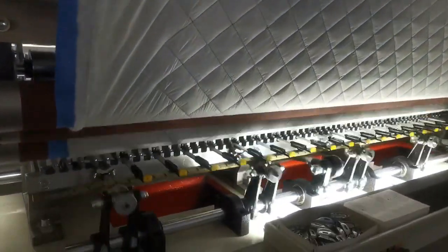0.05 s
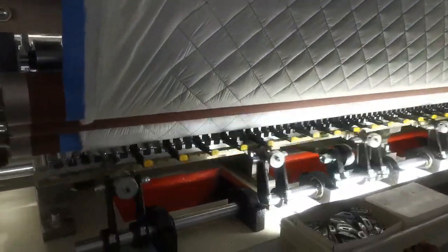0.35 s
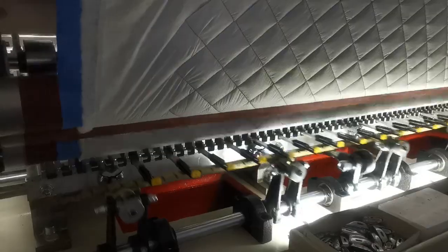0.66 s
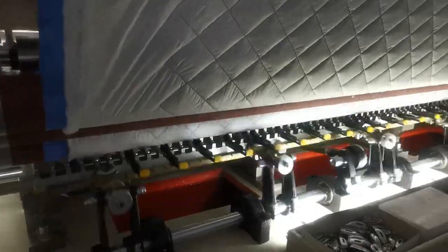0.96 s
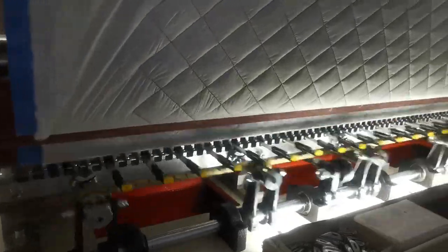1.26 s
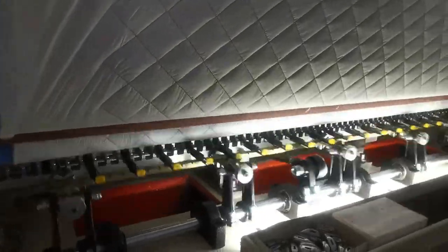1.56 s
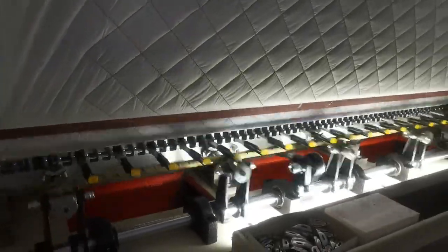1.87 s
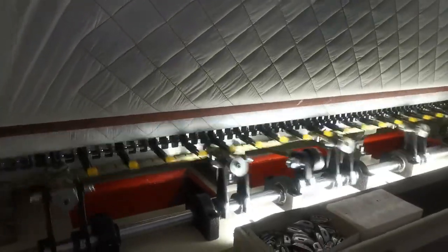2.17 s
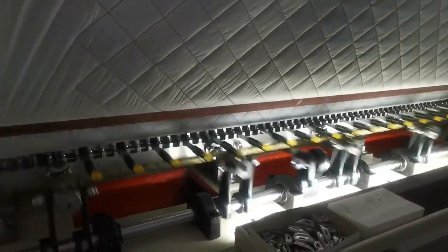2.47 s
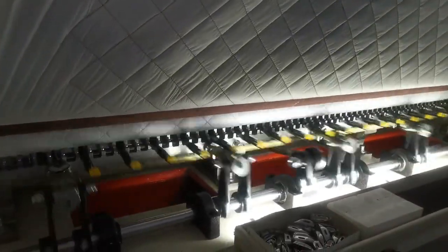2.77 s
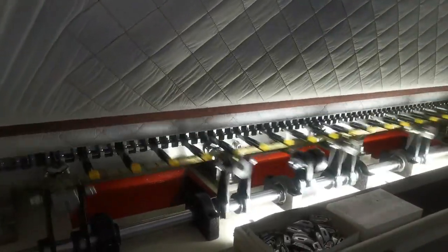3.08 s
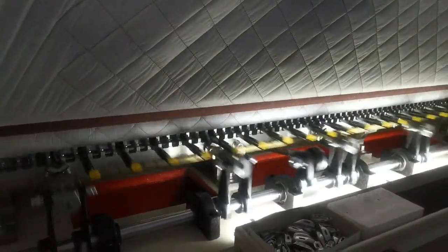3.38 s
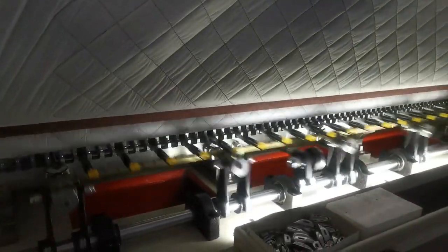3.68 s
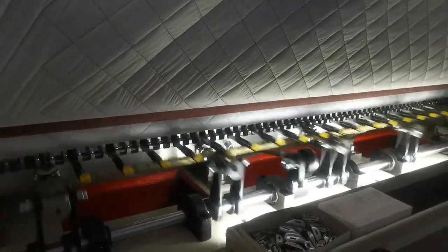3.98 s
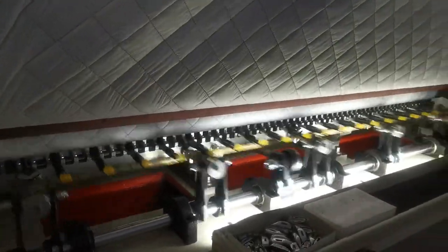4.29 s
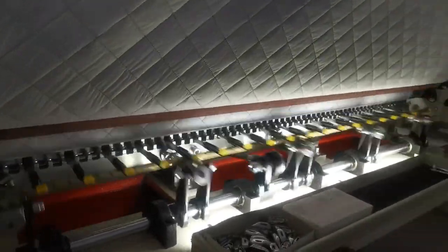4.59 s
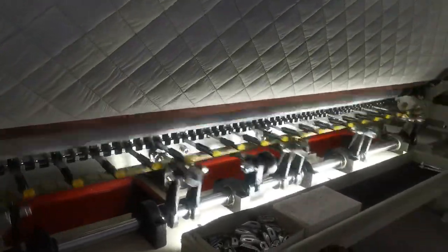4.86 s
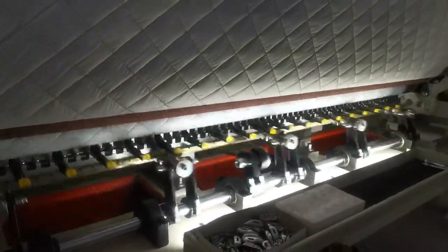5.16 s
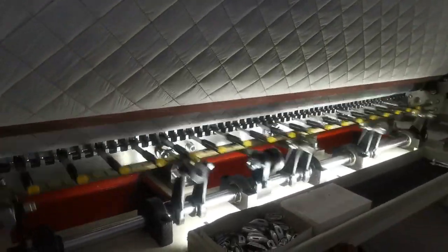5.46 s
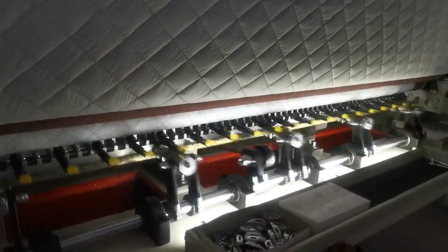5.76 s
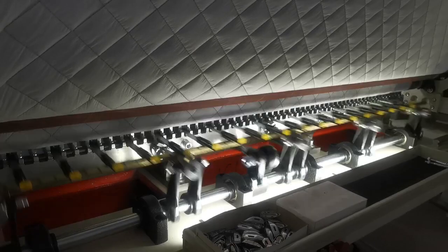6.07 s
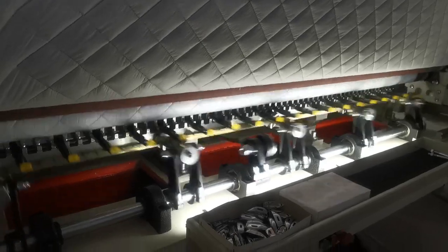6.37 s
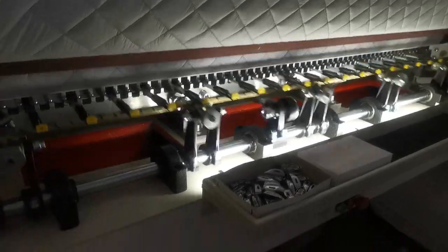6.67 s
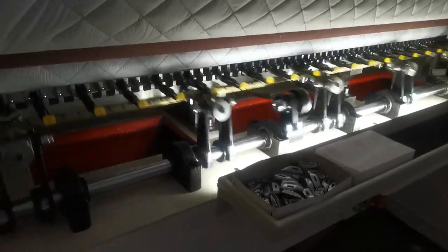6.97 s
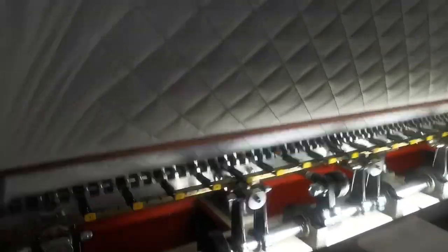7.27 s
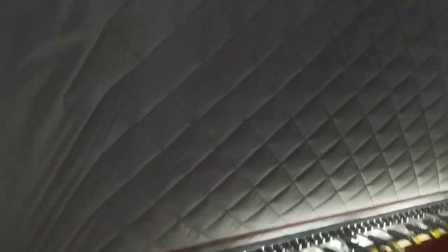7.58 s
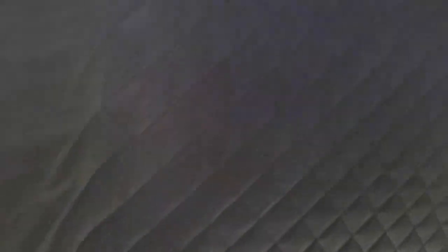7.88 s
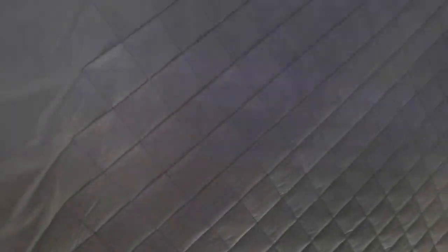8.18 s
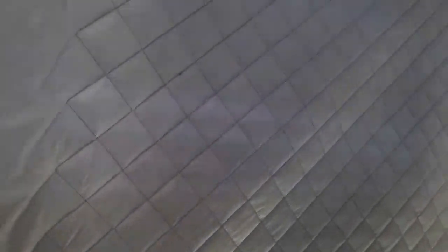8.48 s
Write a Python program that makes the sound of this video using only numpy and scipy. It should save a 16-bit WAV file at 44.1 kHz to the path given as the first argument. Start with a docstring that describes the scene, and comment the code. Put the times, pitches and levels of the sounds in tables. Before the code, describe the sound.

Fast, regular metal clatter comes from a quilting machine heard close up in a workshop with a short echo. Each stitch brings low thumps, a ringing steel clack and a rattle of needles, with a motor humming underneath. Hollow clunks and scraping stand out at first, ease off, then swell and slowly fade midway. Toward the end the handheld microphone shifts and a soft, rough whine rises and holds.

```python
"""Fast steel clacking over a thumping frame: a multi-needle quilting machine, close, in a workshop.
In each stitch, 500 a minute, rocker arms thump the frame, loopers clack and the needle bar rattles
through the quilt. Under load the traversing carriage clunks, knocks and scrapes harder; a motor hums.
The handheld microphone drifts away, then turns up to the quilt as a feed drive starts to whine."""
import sys
import numpy as np
from scipy import signal
from scipy.fft import rfft, irfft, next_fast_len
from scipy.io import wavfile
from scipy.ndimage import map_coordinates

SR = 44100
rng = np.random.default_rng(int(sys.argv[2]) if len(sys.argv) > 2 else 0)


def int16_out(signal):
    """Quantize to a 16-bit WAV file."""
    q = np.round(np.clip(np.atleast_2d(signal).T, -1, 1) * 32767)
    wavfile.write(sys.argv[1], SR, q.astype(np.int16))


N = 376613
T = np.arange(N) / SR
STITCH_S, FIRST_STITCH_S = .12, .056
STITCHES_S = FIRST_STITCH_S + STITCH_S * np.arange(-1, N / SR / STITCH_S)
FEED_ON_S, FEED_RISE_S, FEED_HZ, FEED_DB = 7.55, .35, 591, -46
TURN_AT_S, TURN_TAKES_S = 7.1, .55
# response to carriage load: free_db, added_at_full_load_db
SHUDDER_DB, KNOCK_DB, CLUNK_DB, SCRAPE_DB = (-40, 1.4), (-14, 12.5), (-62, 15), (-52, 7)
ROCKER_DB, BAR_DB = (1.5, -2.5), (1.1, -.5)  # a loaded frame is braced, thumps less

# room decay: freq_hz, t60_s
ROOM_DECAY = [(200, 0.35), (2000, 0.37), (8000, 0.24), (15000, 0.15)]
# main motor lines: pitch_hz, level_db
MOTOR_LINES = [(118, -59.5), (275, -46.5)]
# machine rocking: stitch_rate_multiple, level_db
SWAY_LINES = [(5, -56), (7, -60), (8, -56), (11, -55), (12, -51), (14, -54.5)]
# spectra of the parts: freq_hz, gain_db
WHIRR_SPECTRUM = [(300, -11.5), (1200, -8), (2600, 0), (4200, -2), (6300, -5), (8000, -3.5), (9500, -14),
                  (11500, -21.5), (15000, -33)]
RUMBLE_SPECTRUM = [(20, -34), (42, -15), (75, -19), (125, -1), (220, 0.5), (380, -6.5), (500, -6.5),
                   (800, -9), (1400, -16.5), (3000, -27), (8000, -33)]
SHUDDER_SPECTRUM = [(20, -40), (110, -25), (155, -5), (210, -8), (295, 1), (400, -1), (500, -6), (620, -3),
                    (850, -4), (1200, -12), (2500, -27), (5000, -55)]
CLUNK_SPECTRUM = [(150, -21), (500, -8.5), (930, 1), (1150, 1), (1450, -5.5), (1750, -4.5), (2000, -0.5),
                  (2350, 0.5), (3000, -15), (9000, -34)]
SCRAPE_SPECTRUM = [(150, -25), (350, -1.5), (480, -7.5), (620, -2), (760, -0.5), (920, -4), (1200, -10),
                   (2000, -16), (6000, -36)]
LOOPER_SPECTRUM = [(500, -26), (1500, -17), (2600, -3.5), (4000, -1), (5000, 4), (6300, -2.5), (8000, 3),
                   (9300, -5), (11500, -17), (15000, -11)]
NEEDLE_SPECTRUM = [(500, -29.5), (1500, -8), (2500, -0.5), (4000, -2.5), (5200, 1), (6300, -4),
                   (8000, -2.5), (9300, -7), (11500, -18), (15000, -18)]
# reversals and carriage knocks within a stitch: start_s, pitch_hz, level_db, swell_s
ROCKER_THUMPS = [(.0283, 182, -25, .0054), (.0432, 200, -37, .006), (.1205, 280, -37, .004)]
BAR_THUMPS = [(.0604, 135, -30, .004), (.0685, 222, -25.5, .0034), (.088, 250, -35, .004),
              (.1012, 160, -36, .005)]
CARRIAGE_KNOCKS = [(.0575, 443, -29.5, 0.003), (.0695, 287, -30, 0.0029), (.0525, 920, -32, 0.0028)]
# slow swing of the frame's thumps: time_s, gain_db
THUMP_SWING = [(0, -2), (4.05, 0.5), (4.4, -3), (5.3, -3), (5.75, 0.5), (6.25, -3.5), (7.1, -5),
               (7.55, 0.5), (8.54, -3)]
# carriage traverses: loaded_at_s, rise_s, hold_s, fall_s, load_fraction
CARRIAGE_TRAVERSES = [(0, .1, 0.69, 0.18, 0.92), (1.87, 0.16, 0.12, 0.2, 0.33),
                      (4.8, 1.25, 0.58, 2.5, 0.93)]
# contact volleys within a stitch: start_s, length_s, level_db, fade_db
CLUNK_VOLLEYS = [(.0495, .008, 0, 2)]
SCRAPE_VOLLEYS = [(.05, .038, 0, 3)]
LOOPER_VOLLEYS = [(.0048, 0.0027, -11.5, -6.5), (.008, .008, 0.5, 1.5), (.016, .016, 0, 11),
                  (.033, 0.025, -9, -4), (.113, 0.0093, -12, -3)]
NEEDLE_VOLLEYS = [(.0672, .012, -2.5, 1.6), (.079, .016, -2.5, 1.4), (.095, 0.01, -10, 9.9)]
# harder looper strikes: time_s, extra_db
LOOPER_ACCENTS = [(0.184, 0.5), (0.544, 1.5), (0.784, 0.5), (1.024, 2), (1.384, 1.2), (3.664, 1.5),
                  (6.304, 1.5), (6.544, 1.5), (7.744, 1.5), (8.344, 2)]
# resonances of small steel parts: centre_hz, half_width_hz, gain_db
STEEL_PEAKS = [(5090, 240, 4), (5510, 210, 3.5), (7130, 430, 6.5), (7734, 253, 7), (8820, 220, 4),
               (10440, 220, 2.5)]
# ringing modes: pitch_hz, level_db
LOOPER_MODES = [(5030, 5), (7600, -8)]
NEEDLE_MODES = [(5380, 4), (7800, -13)]
# microphone closeness to the moving parts: time_s, near_db
MIC_CLOSENESS = [(0, 3.5), (.6, 2.5), (1.6, 0.5), (3, -0.7), (4, 0.5), (7.15, -1.8), (7.65, 2.6),
                 (8.54, 1.9)]
# left-right likeness at the microphone ports: freq_hz, correlation
PORT_LIKENESS = [(100, 0.94), (250, 0.94), (500, 0.71), (1000, 0.073), (4000, 0)]
# port colour: freq_hz, left_minus_right_db
PORT_TILT = [(60, -3), (110, -1.5), (200, -3.5), (380, -1.5), (700, -3.5), (1290, 0), (2380, 0.5),
             (4400, -2), (8120, 0.5), (15000, -3)]


def amp(db):
    """Decibels to gain."""
    return 10 ** (np.asarray(db) / 20)


def unit(x):
    """Scale to rms 1."""
    return x / np.sqrt(np.mean(x ** 2) + 1e-20)


def along(points, hz):
    """Interpolate (freq_hz, value) points on a log axis."""
    freq_hz, values = np.transpose(points)
    return np.interp(np.log(hz + 1), np.log(freq_hz + 1), values)


def curve(points):
    """Interpolate (time_s, value) points per sample."""
    return np.interp(T, *np.transpose(points))


def ramp(start_s, length_s):
    """Straight rise from 0 to 1."""
    return np.clip((T - start_s) / length_s, 0, 1)


def wobble(rate_hz):
    """Smooth random curve, rate_hz knots a second."""
    return map_coordinates(rng.standard_normal(int(N * rate_hz / SR) + 4), [T * rate_hz])


def loaded_db(response, load):
    """Gain of a part under load."""
    free_db, added_db = response
    return free_db + added_db * load


def coloured(x, spectrum, peaks=()):
    """Minimum-phase filter: a spectrum plus resonance peaks. Output rms 1."""
    size = 2 * next_fast_len(N // 2 + SR // 10)
    hz = np.fft.rfftfreq(size, 1 / SR)
    peaks_db = sum(db / (1 + ((hz - centre) / width) ** 2) for centre, width, db in peaks)
    cepstrum = irfft(np.log(amp(along(spectrum, hz) + peaks_db)), size)
    cepstrum[1:size // 2] *= 2
    cepstrum[size // 2 + 1:] = 0
    return unit(irfft(rfft(x, size) * np.exp(rfft(cepstrum)), size)[..., :N])


def spread(pair, spectrum):
    """Two unrelated signals to stereo of rms 1: long waves reach both ports alike."""
    size = next_fast_len(N)
    hz = np.fft.rfftfreq(size, 1 / SR)
    angle = np.arccos(along(PORT_LIKENESS, hz)) / 2
    gain = amp(along(spectrum, hz)) * [np.cos(angle), np.sin(angle)]
    mid, side = irfft(rfft(pair, size) * gain, size)[:, :N]
    return unit(np.array([mid + side, mid - side]))


def thumps(rows, scatter_db, detune):
    """Each push swings the heavy frame for a few cycles."""
    out, t = np.zeros(N + 2 * SR), np.arange(SR // 10) / SR
    for stitch_s in STITCHES_S:
        for start_s, hz, db, swell_s in rows:
            force, bend = rng.standard_normal(2)
            envelope = (t / swell_s) ** 2 * np.exp(2 * (1 - t / swell_s))
            swing = envelope * np.sin(2 * np.pi * hz * (1 + detune * bend) * t)
            out[round((1 + stitch_s + start_s) * SR):][:len(t)] += amp(db + scatter_db * force) * swing
    return out[SR:SR + N]


def volleys(rows, count, stitch_scatter_db, hit_scatter_db, jitter_s, accent_db=0):
    """Stereo impulses: in each stitch a row of like parts makes contact, one after another."""
    out = np.zeros((2, N))
    for start_s, length_s, db, fade_db in rows:
        slip, force = rng.standard_normal((2, len(STITCHES_S), 1))
        place = (np.arange(count) + rng.random((len(STITCHES_S), count))) / count
        hit_s = STITCHES_S[:, None] + start_s + jitter_s * slip + length_s * place
        hit_db = db - fade_db * place + accent_db + stitch_scatter_db * force
        hits = amp(hit_db + hit_scatter_db * rng.standard_normal(hit_s.shape))
        hits *= rng.choice([-1, 1], hit_s.shape)
        lag_s = rng.uniform(-.0004, .0004, hit_s.shape)  # parts lie left and right along the bed
        for channel, side in zip(out, (-1, 1)):
            at = np.round((hit_s + side * lag_s) * SR).astype(int)
            heard = (at >= 0) & (at < N)
            channel += np.bincount(at[heard], hits[heard], N)
    return out


def pings(modes, start_s, t60_s, detune, scatter_db, accent_db=0):
    """Steel rings on after a volley, at a slightly different pitch each time. Stereo, rms 1."""
    out, t = np.zeros((2, N + 2 * SR)), np.arange(SR // 10) / SR
    for channel in out:
        for stitch_s, extra_db in np.broadcast(STITCHES_S, accent_db):
            for hz, db in modes:
                force, bend = rng.standard_normal(2)
                envelope = amp(db + extra_db + scatter_db * force - 60 * t / t60_s)
                at = round((1 + stitch_s + start_s + .002 * rng.random()) * SR)
                channel[at:at + len(t)] += envelope * np.sin(2 * np.pi * hz * (1 + detune * bend) * t)
    return np.array([unit(channel[SR:SR + N]) for channel in out])


def workshop(x):
    """Diffuse, smooth room tail, drawn afresh every quarter second; each frequency has its own decay."""
    out, block = np.zeros((2, N + SR)), SR // 4
    for at in range(0, N, block):
        hz, t, noise = signal.stft(rng.standard_normal((2, SR // 3)), SR, nperseg=256)
        decay = amp(-60 * t / along(ROOM_DECAY, hz)[:, None])
        tail = signal.istft(noise * decay, SR, nperseg=256)[1]
        wet = signal.fftconvolve(x[:, at:at + block], tail / np.linalg.norm(tail[0]), axes=1)
        out[:, at:at + wet.shape[1]] += wet
    return out[:, :N]


def motors():
    """Slightly unsteady hum of the main motor; the feed drive's rough whine swells and holds."""
    def line(hz, waver_rad):
        return unit(np.sin(2 * np.pi * hz * T + waver_rad * wobble(25)))
    hum = sum(amp(db) * line(hz, waver_rad=.38) for hz, db in MOTOR_LINES)
    whine = amp(FEED_DB) * ramp(FEED_ON_S, FEED_RISE_S) * line(FEED_HZ, waver_rad=1.15)
    return hum + whine


def whirr():
    """Bearings and running threads keep the steel ringing between blows."""
    return coloured(rng.standard_normal((2, N)), WHIRR_SPECTRUM, STEEL_PEAKS)


def sway():
    """Swinging masses rock the machine at multiples of the stitch rate."""
    out = np.zeros(N)
    for multiple, db in SWAY_LINES:
        gain = amp(db + 2 * wobble(1.96))
        out += gain * unit(np.cos(2 * np.pi * (multiple * T / STITCH_S + rng.random())))
    return out


def shudder(drift_s):
    """Cams and linkages shake the frame the same way on every shaft turn."""
    period = round(STITCH_S * SR)
    cycle = irfft(np.exp(2j * np.pi * rng.random((2, period // 2 + 1))), period)
    at = np.round((T + drift_s * wobble(6)) * SR).astype(int) % period
    return spread(cycle[:, at], SHUDDER_SPECTRUM)


def frame(load, near_db):
    """The heavy frame thumps, sways and shudders; the carriage taking up play adds hollow knocks."""
    swing_db = curve(THUMP_SWING)
    rockers = thumps(ROCKER_THUMPS, scatter_db=.44, detune=.0071)
    rockers *= amp(loaded_db(ROCKER_DB, load) + swing_db)
    needle_bar = thumps(BAR_THUMPS, scatter_db=1, detune=.0083)
    needle_bar *= amp(loaded_db(BAR_DB, load) + .7 * swing_db)
    swaying = sway()
    shaking = amp(-2.5) * shudder(drift_s=.00012) + spread(rng.standard_normal((2, N)), RUMBLE_SPECTRUM)
    shaking *= amp(loaded_db(SHUDDER_DB, load) + .62 * near_db)
    knocks = thumps(CARRIAGE_KNOCKS, scatter_db=.8, detune=.04)
    knocks *= amp(loaded_db(KNOCK_DB, load) + near_db)
    return rockers + needle_bar + swaying + knocks + shaking


def carriage_load():
    """Each traverse takes up load, holds it and lets it go."""
    return sum(load * (ramp(at_s - rise_s, rise_s) - ramp(at_s + hold_s, fall_s))
               for at_s, rise_s, hold_s, fall_s, load in CARRIAGE_TRAVERSES)


def carriage(load, turn):
    """Once a stitch the carriage takes up its play and judders along its rail."""
    clunks = volleys(CLUNK_VOLLEYS, count=20, stitch_scatter_db=-1.1, hit_scatter_db=3.5, jitter_s=.0005)
    judder = volleys(SCRAPE_VOLLEYS, count=30, stitch_scatter_db=2.5, hit_scatter_db=4, jitter_s=.00051)
    clunk_db = loaded_db(CLUNK_DB, load)
    scrape_db = loaded_db(SCRAPE_DB, load) + .5 * turn  # the turned microphone hears more rail
    clunk = amp(clunk_db) * coloured(clunks, CLUNK_SPECTRUM)
    return clunk + amp(scrape_db) * coloured(judder, SCRAPE_SPECTRUM)


def loopers():
    """The steel loopers snap shut together and ring; harder strikes ring more."""
    time_s, extra_db = np.transpose(LOOPER_ACCENTS)
    accent_db = (abs(STITCHES_S[:, None] - time_s) < STITCH_S / 2) @ extra_db
    hits = volleys(LOOPER_VOLLEYS, count=60, stitch_scatter_db=.24, hit_scatter_db=3.5, jitter_s=.0003,
                   accent_db=accent_db[:, None])
    ring = pings(LOOPER_MODES, start_s=.008, t60_s=.038, detune=.025, scatter_db=2,
                 accent_db=2.3 * accent_db)
    return coloured(hits, LOOPER_SPECTRUM, STEEL_PEAKS) + amp(-9.5) * ring


def needles():
    """Half a stitch after the loopers the needles rattle through the quilt, ringing a little higher."""
    hits = volleys(NEEDLE_VOLLEYS, count=90, stitch_scatter_db=1.25, hit_scatter_db=2, jitter_s=.0004)
    ring = pings(NEEDLE_MODES, start_s=.069, t60_s=.082, detune=.0116, scatter_db=1.5)
    return coloured(hits, NEEDLE_SPECTRUM, STEEL_PEAKS) + amp(-9) * ring


def microphone_aim(x, turn, near_db):
    """Coming closer brightens the metal; turning to the quilt trades the bed's ring for clatter."""
    def band_change(edges_hz, gain_db):
        sos = signal.butter(2, edges_hz, "band", fs=SR, output="sos")
        return (amp(gain_db) - 1) * signal.sosfiltfilt(sos, x)
    clatter = band_change([2200, 4300], 1.08 * turn + .5 * near_db)
    ring = band_change([6200, 8400], -3.15 * turn)
    top = band_change([8600, 12000], near_db)
    return x + clatter + ring + top


def scene():
    """Frame, motors and steel parts; only the steel parts and carriage feed the room tail."""
    load, near_db = carriage_load(), curve(MIC_CLOSENESS)
    turn = ramp(TURN_AT_S, TURN_TAKES_S)  # 0 facing the steel bed, 1 facing the quilt
    body = frame(load, near_db)
    metal = amp(-36.5) * loopers() + amp(-37) * needles() + carriage(load, turn)
    metal = metal + amp(-5.5) * workshop(metal) + amp(-37.5) * whirr()
    return body + microphone_aim(metal, turn, near_db) + motors()


def record(dry):
    """The two ports differ a little in colour; nothing passes above top_hz."""
    size, top_hz = next_fast_len(N + SR // 10), 15250
    hz = np.fft.rfftfreq(size, 1 / SR)
    ports = amp(along(PORT_TILT, hz) * np.array([[.5], [-.5]]))
    return irfft(rfft(dry, size) * ports * (hz < top_hz), size)[:, :N]


dry = scene()
out = record(dry)
int16_out(out)
```